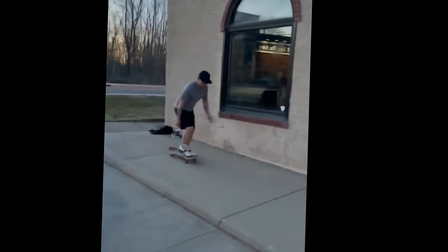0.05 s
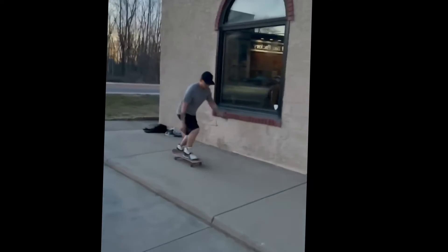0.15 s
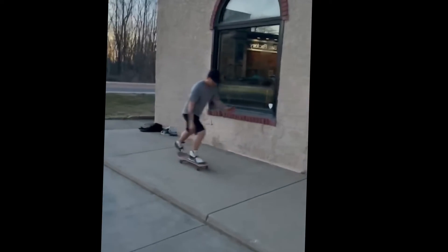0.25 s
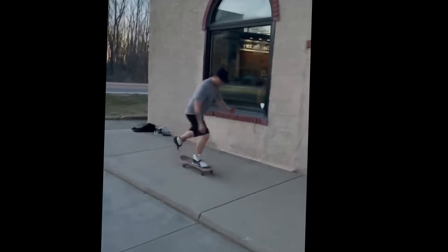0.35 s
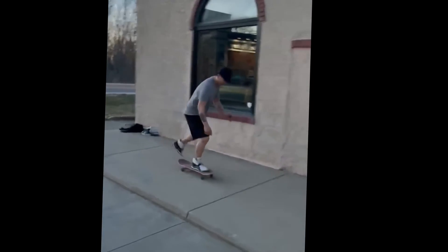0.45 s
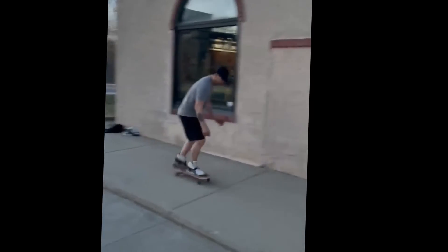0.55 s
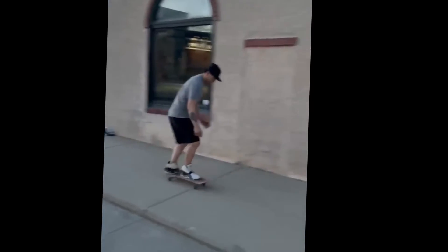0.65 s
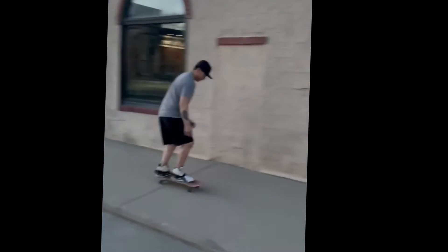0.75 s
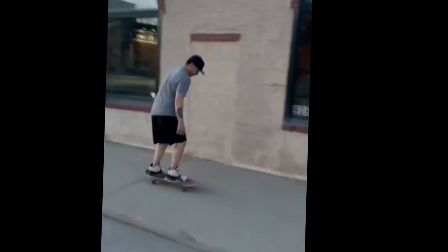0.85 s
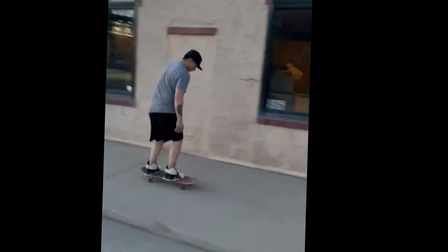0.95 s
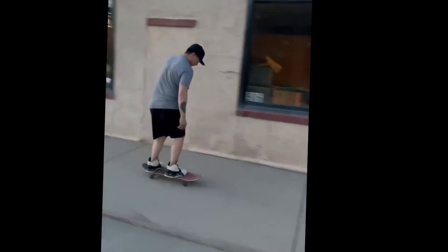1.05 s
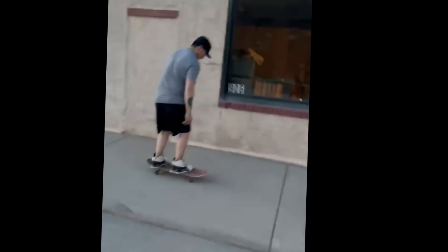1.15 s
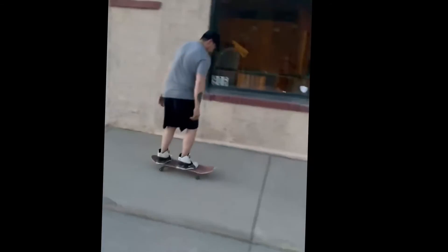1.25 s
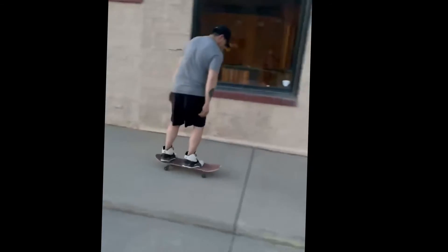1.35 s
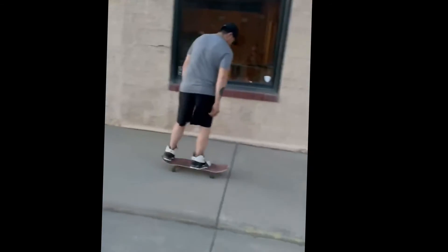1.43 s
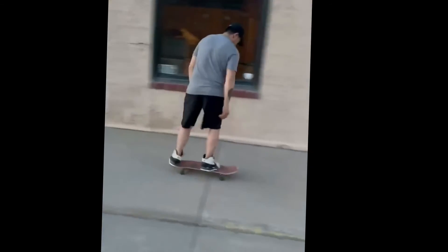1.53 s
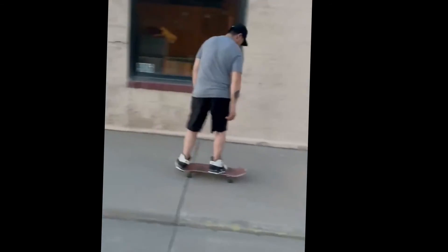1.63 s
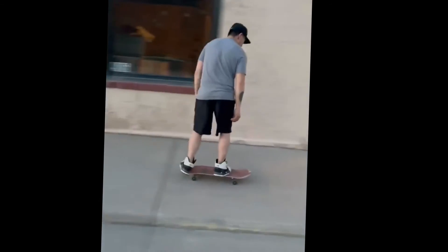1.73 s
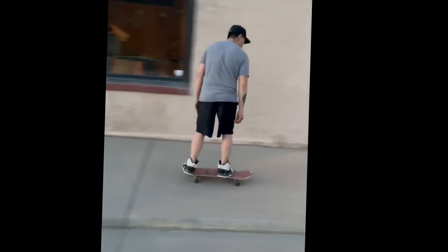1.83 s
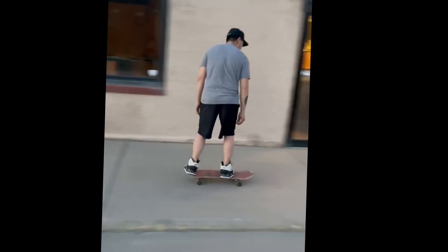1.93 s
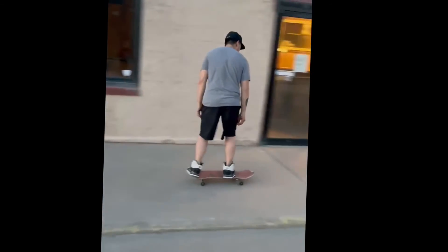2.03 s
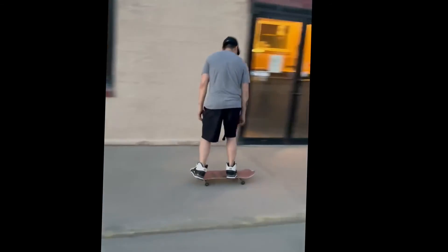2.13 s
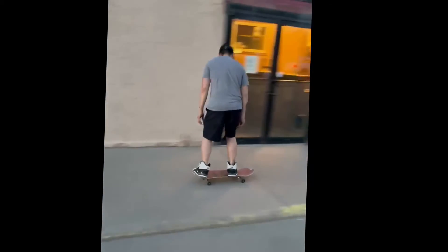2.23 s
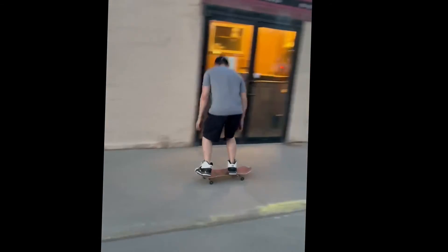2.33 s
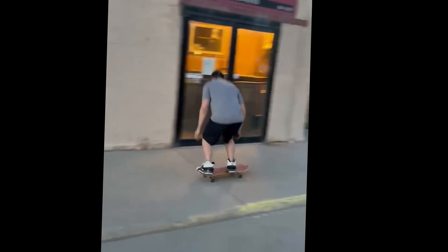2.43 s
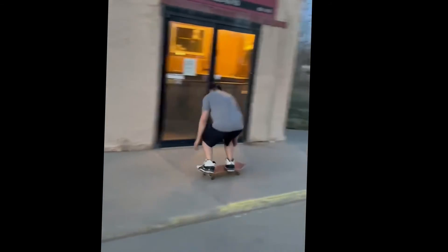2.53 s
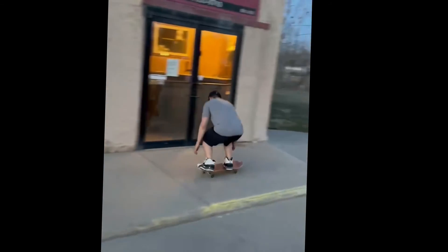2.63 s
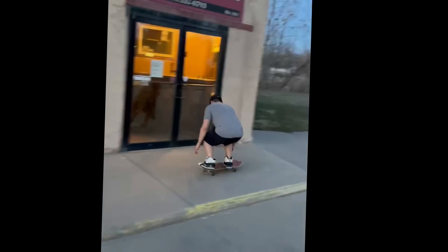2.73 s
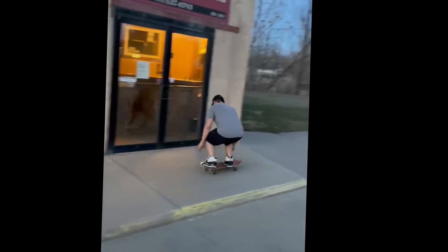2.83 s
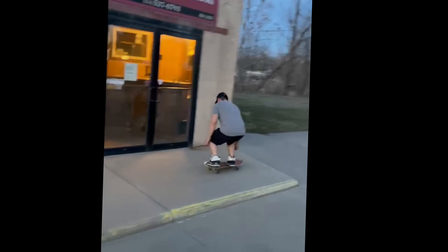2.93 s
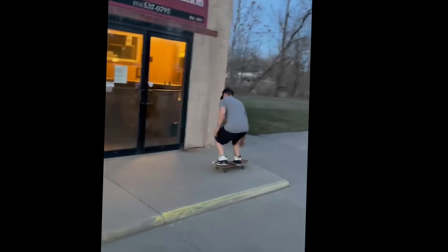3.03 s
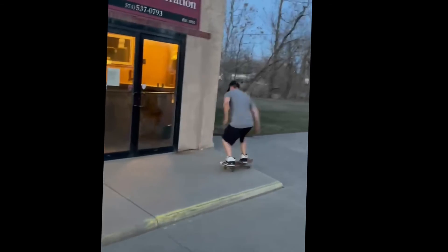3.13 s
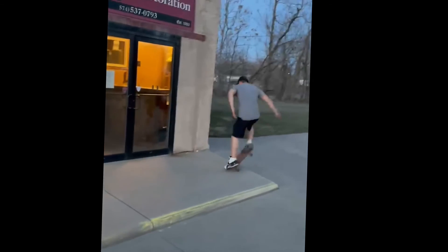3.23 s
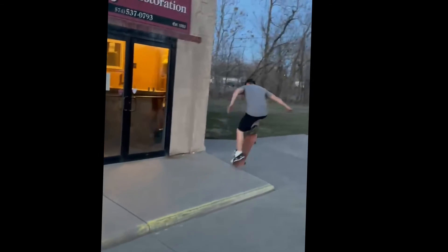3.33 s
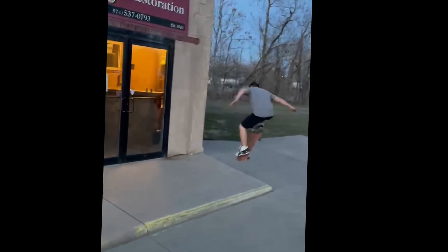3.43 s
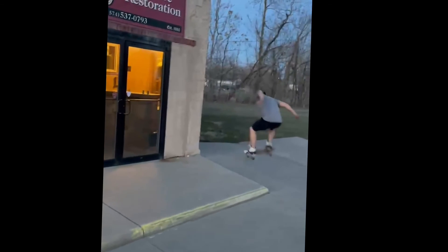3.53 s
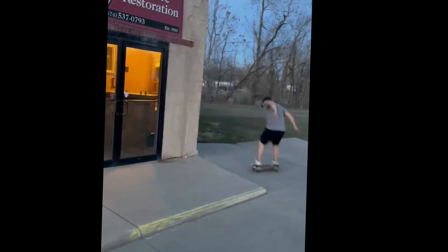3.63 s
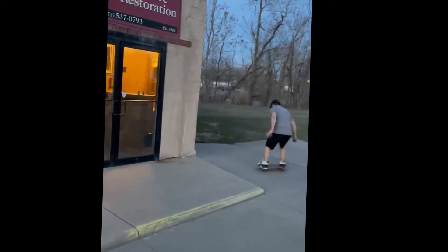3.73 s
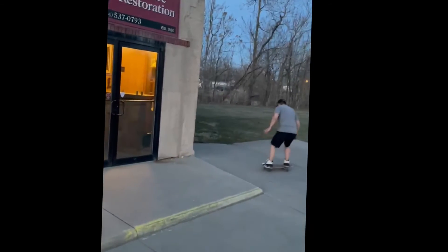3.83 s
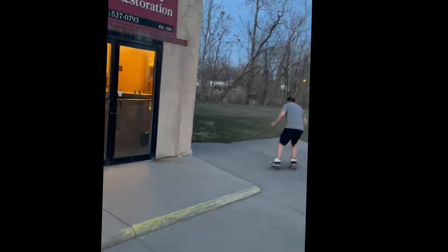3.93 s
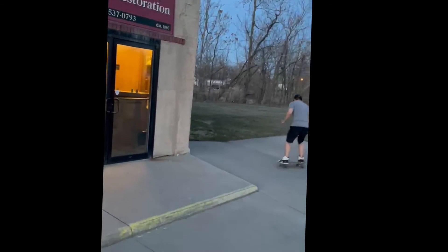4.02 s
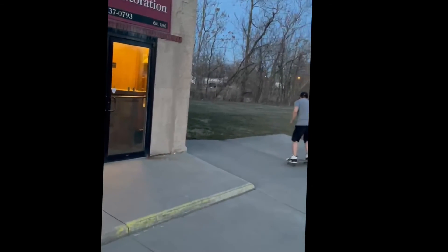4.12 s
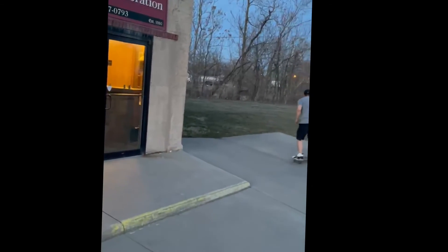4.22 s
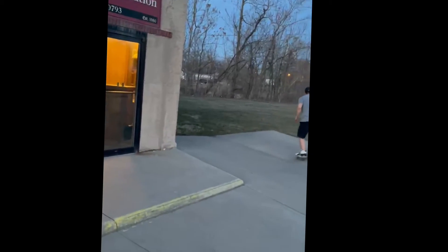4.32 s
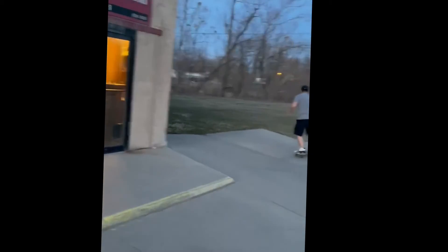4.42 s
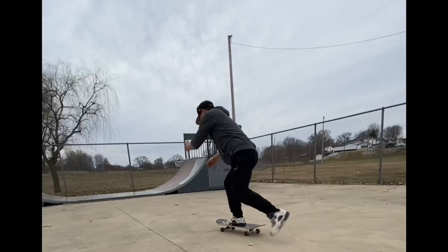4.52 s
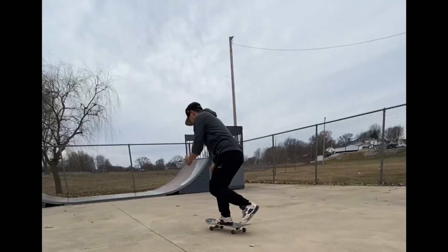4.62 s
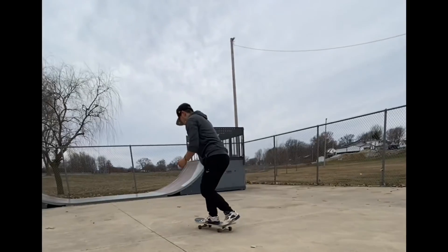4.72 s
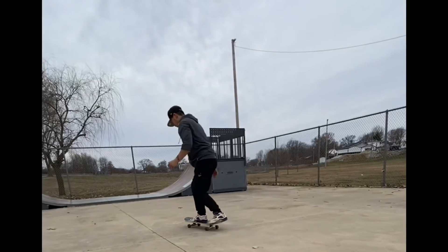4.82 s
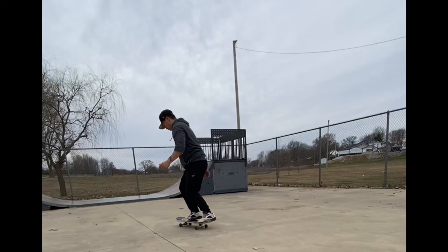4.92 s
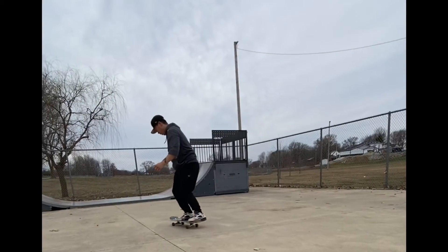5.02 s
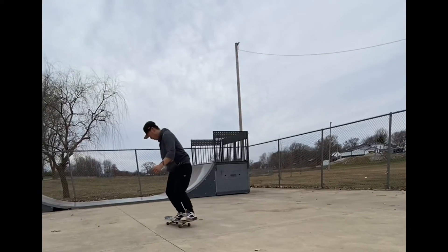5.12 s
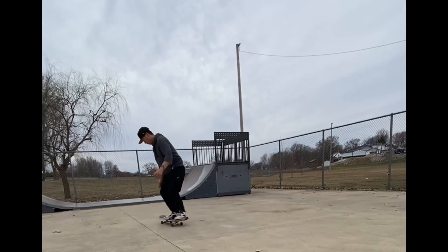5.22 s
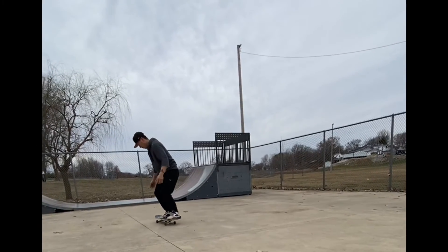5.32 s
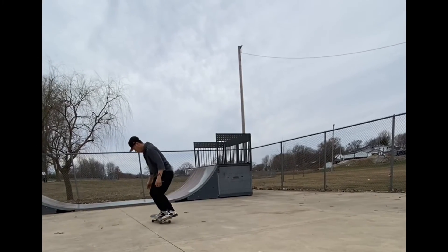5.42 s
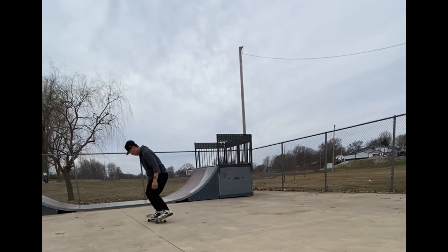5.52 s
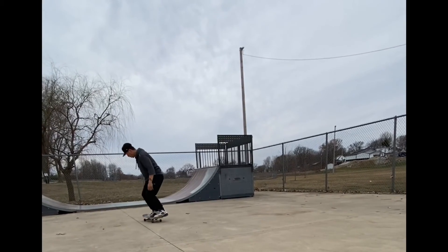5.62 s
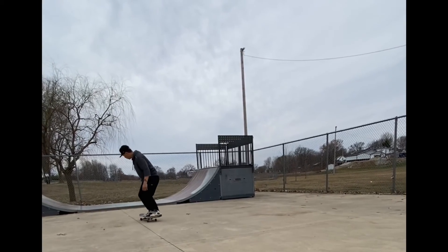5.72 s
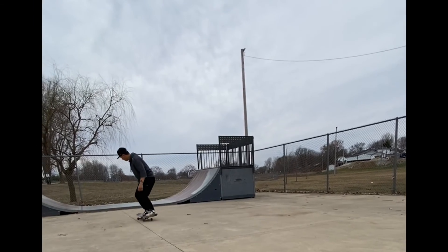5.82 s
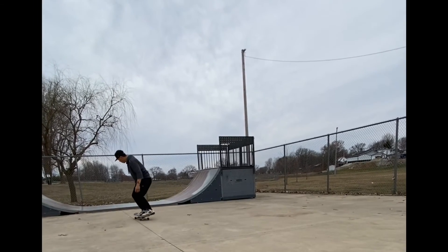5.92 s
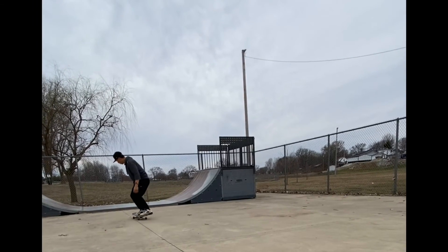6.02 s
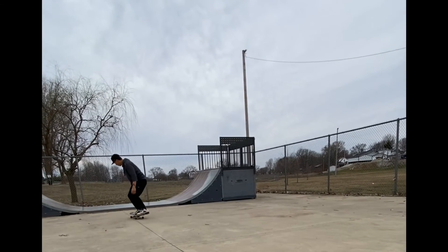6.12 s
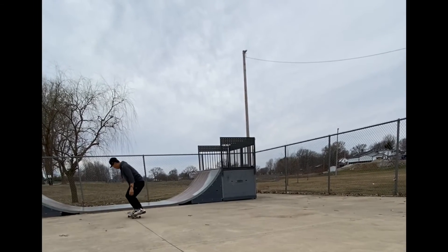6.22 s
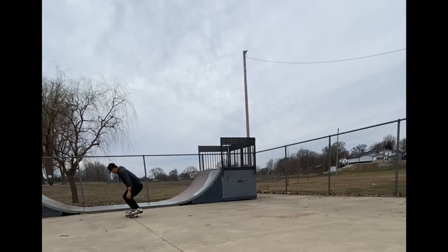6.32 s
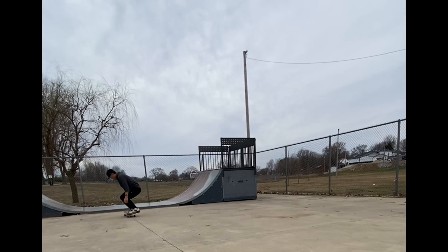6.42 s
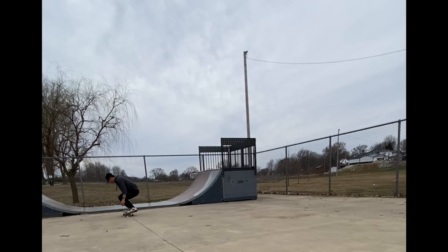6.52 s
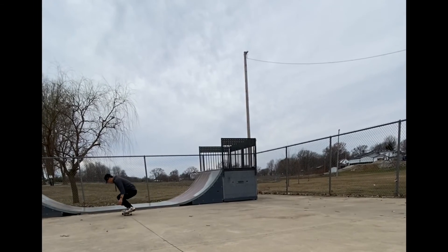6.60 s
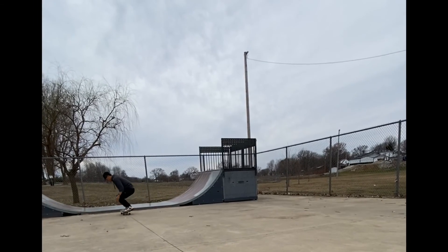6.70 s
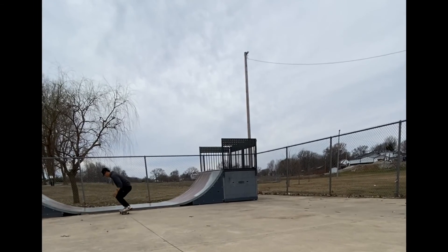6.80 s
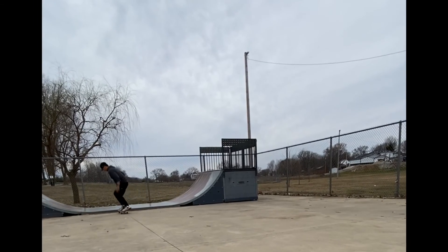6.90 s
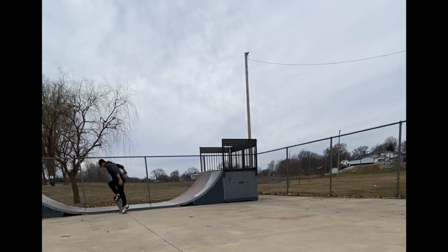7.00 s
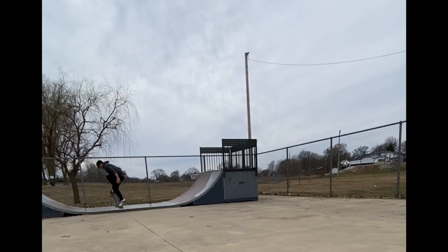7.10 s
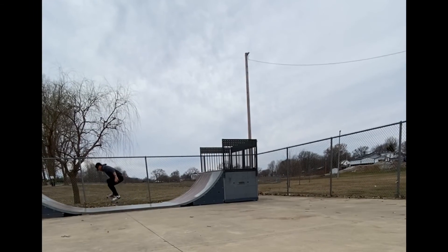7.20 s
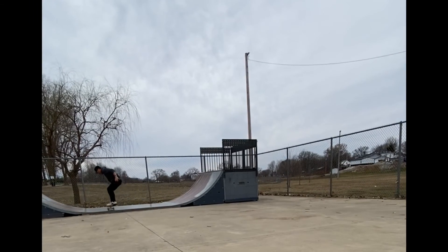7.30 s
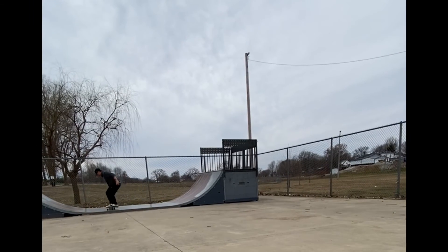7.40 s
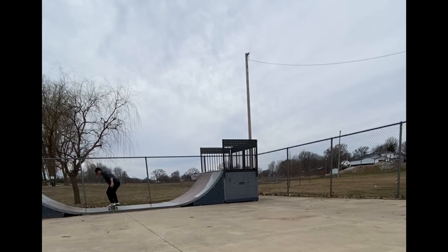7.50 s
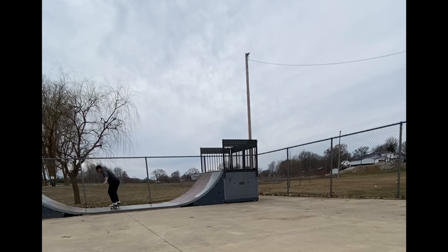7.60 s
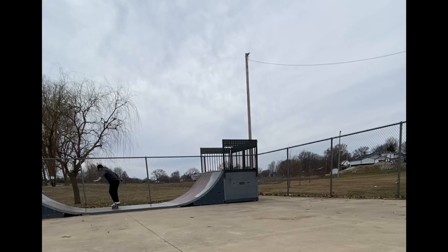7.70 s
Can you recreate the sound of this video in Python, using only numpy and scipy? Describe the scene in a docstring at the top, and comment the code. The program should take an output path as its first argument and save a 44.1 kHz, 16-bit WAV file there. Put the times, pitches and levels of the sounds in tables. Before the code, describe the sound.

From 0 to 4.5 s a skateboard rolls close by on sidewalk concrete, a low rumble with mid roar and gritty hiss, rising slightly around 0.5 s. Wheels cross slab joints in double clacks at about 0.6 and 0.7, 1.45 and 1.6 (deepest), 2.25 and 2.4 s, woody with metallic truck rattle. The hiss dulls as the rider pulls ahead. A sharp tail pop comes at 3.2 s, a doubled landing crack at 3.6, then rolling with ticks, scuffs and a tiny squeak near 4.3. A hard cut at 4.5 s opens onto faint outdoor air and a quieter, smoother roll moving away from a still phone, with light taps and a bright click near 6.25. The roll fades out; a pop at 6.95 leaves a brief gap with faint echo, then a heavy smack at 7.28 booms on a hollow ramp, with small thumps and fading drumming to the end.

```python
"""Skateboards, sidewalk and park

Two skateboard runs on a phone's two microphones, joined by a hard cut. On a sidewalk, riding alongside: filtered
grit noise rumbles, short struck-deck blows clack over joints, then the tail pops and the board lands.
In an open skate park, phone at rest: the roll fades with distance, ticks over seams, pops, and smacks
down at the foot of a hollow ramp that rings in decaying modes under a faint rush of open air.
"""
import sys
import numpy as np
from scipy import signal
from scipy.fft import rfft, irfft, next_fast_len
from scipy.io import wavfile
from scipy.ndimage import uniform_filter1d

SR = 44100
rng = np.random.default_rng(int(sys.argv[2]) if len(sys.argv) > 2 else 0)


def to_wav(sig):
    """Store sig (one row per channel, or 1-D mono) as 16-bit WAV at the path in sys.argv[1].

    Samples outside -1..1 are clipped; the rate is SR.
    """
    pcm = np.clip(np.atleast_2d(sig), -1, 1) * 32767
    pcm = np.round(pcm).astype(np.int16)
    wavfile.write(sys.argv[1], SR, pcm.T)  # frames by channels


N = 341775
TIME = np.arange(N) / SR
CUT_S = 4.48  # sidewalk before, park after

# Spectrum of rolling noise, before its three registers are set to level: f/Hz, density/dB per Hz
WALK_TONE = [(25, -24), (60, -0.5), (100, 1), (200, 0.5), (400, -10), (620, -10.5), (1000, -13.5),
             (1700, -28.5), (3000, -33.5), (8500, -45.5), (11000, -31.5), (13000, -66), (16000, -86.5)]
PARK_TONE = [(25, -35), (70, -0.5), (135, -4), (180, -5.5), (280, 0), (420, -6), (620, -19), (950, -10.5),
             (1600, -12), (2100, -34.5), (2950, -34), (3500, -33), (6000, -35.5), (8000, -40),
             (11500, -37.5), (13500, -38), (16000, -77)]
RAMP_TONE = [(25, -27), (60, -4), (110, 1), (220, -8), (350, -17.5), (700, -26), (1500, -36.5), (3000, -53),
             (6000, -51.5), (9000, -62), (16000, -65)]
# Spectrum of the boards' contact noise, before levelling: f/Hz, density/dB per Hz
WALK_CLACK = [(60, -6), (160, 8.5), (300, -2), (700, -1), (1200, 0), (2000, -13), (3200, -16.5),
              (4500, -24), (5700, -21.5), (8500, -30.5), (10800, -15.5), (13000, -42), (16000, -59)]
PARK_CLACK = [(50, -21), (140, 3), (320, 5.5), (480, -4), (650, -8), (900, 6), (1500, -3), (2400, -9.5),
              (4000, -20), (6000, -24), (8000, -39), (12000, -38), (16000, -47)]
# Ringing of deck and trucks, relative to one another: f/Hz, level/dB, t60/s
WALK_MODES = [(497, -23.5, 0.02), (622, 8, 0.024), (740, -1, 0.087), (960, -15.5, 0.063),
              (1116, -16, 0.025), (1186, -2.5, 0.046), (1696, -18, 0.062), (1730, -1.5, 0.05),
              (2046, 3, 0.012), (2250, -7, 0.051), (2900, -60, .04)]
PARK_MODES = [(576, -7, .06), (770, -8, .07), (875, -2, 0.13), (981, -2, .11), (1152, -4, 0.048),
              (1320, -6, 0.08), (1560, -7, 0.06), (2130, -15, .05), (2320, -5, 0.04), (3250, -19, 0.035),
              (3630, -20, .05)]
# The two microphone ports before shading is scaled: f/Hz, left minus right/dB, left lead/rad
WALK_PORTS = [(100.5, 0, 0), (297, 2, 0.09), (596, 8.5, 0.69), (1103, 12.5, 0.65), (1800, 0, -1.1),
              (2970, 1, 1.5), (4360, 3, 1.32), (5050, 1.5, 4), (5540, 0.5, 5.5), (6330, -5, 6.5),
              (7700, 12, 7.5), (10660, -3.5, 10.5), (14050, 3, 14)]
PARK_PORTS = [(97, 0, 0.5), (352, -0.5, 0), (705, -6, 0.3), (1125, -3.5, 1.5), (1460, 3.5, -0.7),
              (2920, -2.5, 2), (4250, -0.5, 0.46), (5280, -9.5, 6), (5390, -1.5, 6), (7200, -0.5, 7.5),
              (11000, 2, 8.5), (14800, -2, 10)]
# Resonances of the rolling boards, mean gain on the rolling noise: f/Hz, width/Hz, gain/dB
WALK_BODY = [(145, 17, -10), (747, 85, 0), (1240, 140, -7), (1510, 215, -0.5)]
PARK_BODY = [(141, 22, -5), (258, 73, -6), (399, 91, -8.5), (815, 74, -3.5), (2620, 150, 1.5),
             (3430, 200, 3), (5440, 500, -10)]
# They drift as the rider shifts his weight (share of their pitch)
WALK_DRIFT, PARK_DRIFT = 0.053, 0.011
# Passing swells of the rolling sound, from ground, foot, echo or settling trucks:
# peak t/s, half length/s, rumble/dB, roar/dB, hiss/dB
ROLL_SWELLS = [(0.58, 0.088, 8, 1.5, 4), (0.97, 0.16, 0, 0.5, 2.5), (1.416, 0.14, 7.5, 1, 1),
               (1.947, 0.21, 3, 1.5, -1), (3.9, 0.15, 0.5, 1.5, 8.5), (4.668, 0.14, 3, 1, 1),
               (4.87, 0.048, -2.5, 0, 3.5), (5.22, 0.11, 4, 2.5, 3.5), (5.353, 0.045, 0, 3.5, 6.5),
               (6.647, 0.33, 3.5, 2.5, 2.5), (7.468, 0.033, 2, 13, 4.5), (7.69, 0.055, 8, 3, -13)]

# Steady sidewalk roll, near the microphone: rumble/dB, roar/dB, hiss/dB
WALK_ROLL_DB = (-31.5, -35.5, -50.5)
# The rider comes near: rumble, roar and hiss rise by these dB around NEAR_S
APPROACH_DB, NEAR_S = (1, 2.5, 2), 0.5
# Hiss lost in flight, and for each second that the board rides ahead after AHEAD_S
FLIGHT_HISS_DB, AHEAD_S, AHEAD_DB_PER_S = -6, 2.03, -1.06
HISS_LAG_S = .08  # the hiss outlasts the pop
# The sizzle atop the hiss is stronger near the board: edge, gain near and far
SIZZLE_HZ, SIZZLE_NEAR_DB, SIZZLE_FAR_DB = 9100, 1.5, -4
# The level of the roll, its ticks, drones and hum is ducked for a moment around DIP_S
DIP_S, DIP_HALF_S, DIP_DB = 3.70, 0.053, -10.5
# Wheel speed on the sidewalk: t/s, rate/turns per s
WHEEL_TURNS = [(0, 27.3), (1.3, 25.6), (2.7, 31.4), (3.3, 35), (4.47, 38.1)]
# Hum of slightly unround wheels at top speed, before wavering: multiple of turn rate, level/dB
WHEEL_HUM, HUM_DB_PER_OCTAVE = [(2, -38), (3, -39), (4, -40), (8, -43)], 12
# Light scuffs; in the park those near 7.17 s are the pop's faint echo:
# peak t/s, half length/s, centre f/Hz, peak level/dB
WALK_SCUFFS = [(.05, 0.033, 1750, -44), (.49, 0.022, 3470, -46), (1.22, 0.029, 3500, -49),
               (3.10, 0.04, 5920, -52), (3.47, 0.021, 1860, -44.5), (4.01, 0.018, 1500, -36.5),
               (4.41, 0.03, 1300, -41)]
PARK_SCUFFS = [(4.85, .05, 2330, -53), (6.14, 0.0076, 5830, -50.5), (6.305, 0.016, 6000, -55),
               (6.855, .008, 1450, -39), (6.905, 0.03, 3950, -53), (6.924, .013, 2300, -50),
               (7.16, 0.025, 4440, -58), (7.178, 0.0099, 900, -50)]
# Short bright ticks, from grit under the wheels and clicks of wheels and hardware:
# t/s, starting level before final filtering/dB, centre f/Hz
WALK_TICKS = [(.157, -42, 10500), (.314, -42, 8500), (.70, -30, 2500), (.918, -32, 2800), (.953, -21, 1800),
              (1.192, -33, 2500), (3.643, -21, 903), (3.652, -23, 2210), (3.828, -30, 1900),
              (3.866, -29, 1900), (3.946, -32, 2000), (4.003, -27, 1803), (4.018, -26, 1500),
              (4.398, -26, 1600)]
PARK_TICKS = [(4.591, -34, 3000), (4.734, -35, 2500), (5.807, -53, 9000), (5.881, -36, 4000),
              (6.003, -49, 9000), (6.212, -37, 6000), (6.263, -20, 1700), (6.407, -48, 11000),
              (6.601, -33, 6000), (6.630, -35, 7950), (6.781, -40, 9000), (6.853, -28, 2000),
              (7.635, -29, 2300), (7.674, -24, 1500)]
# Each listed tick sounds again, later and weaker
AGAIN_S, AGAIN_DB = 0.008, -7
# The deck drones over some stretches of slab: peak t/s, half length/s, centre f/Hz, peak level/dB
DRONES = [(.34, 0.19, 158, -29.5), (2.72, 0.15, 270, -35.5), (2.9, .33, 92, -34), (4.22, .08, 150, -30.5)]
DRONE_WIDTH_HZ = 45

# In all blow tables, crack levels stand before the trim_db of blows(); wood and clank are relative to knock.
# Front and rear axle over three slab joints: t/s, thud/dB, knock/dB, crack/dB, flex f/Hz, flex t60/s,
# wood mode f/Hz, wood/dB, truck clank f/Hz, clank/dB, rattle/s, second wheel delay/s
JOINTS = [(0.579, -16.5, -24.5, -36.5, 164.6, .12, 740, -2, 1100, -2, 0.0079, 0.008),
          (0.720, -17, -21, -33.5, 157, .055, 760, 2, 1060, -1, .006, .005),
          (1.4404, -13, -17, -35, 135.5, 0.21, 712, 6, 1170, -8, 0.008, 0.0077),
          (1.582, -15.5, -22, -35.5, 180, 0.048, 777, -1, 1140, -2.5, 0.0058, 0.0049),
          (2.2603, -27.5, -20.5, -31.5, 288, 0.055, 760, -1, 1610, 0, 0.02, .013),
          (2.4084, -18.5, -23.5, -36.5, 432, .06, 1276, 0.5, 1790, 3, 0.0089, 0.0056)]
# An askew axle's second wheel hits later, softer, and bends the deck in a higher mode
SECOND_RING_DB, SECOND_WHEEL_DB, SECOND_FLEX_RATIO = -10, -6.5, 1.8
# Tail pop, first wheels down, full weight down: t/s, thud/dB, knock/dB, crack/dB, flex f/Hz,
# flex t60/s, wood mode f/Hz, wood/dB, truck clank f/Hz, clank/dB, rattle/s
WALK_JUMP = [(3.2125, -27.5, -20, -26.5, 321, 0.13, 1105, 1, 2250, -4.5, .015),
             (3.575, -22.5, -18.5, -22.5, 273, .069, 915, 0.5, 2300, -10, 0.011),
             (3.584, -19, -16.5, -30.5, 450, 0.017, 596, -0.5, 805, -2, 0.01)]
PARK_JUMP = [(6.951, -31, -25.5, -33, 325, 0.078, 900, -4, 2350, -2.5, 0.0075),
             (7.276, -18, -16, -27.5, 180, 0.15, 873, -1.5, 986, -4, 0.0035),
             (7.283, -11, -23, -27, 92, 0.12, 1145, -7, 1590, -7, 0.013)]
# Light knocks; in the park the one near 7.17 s is the pop's faint echo:
# t/s, thud/dB, knock/dB, deck flex f/Hz
WALK_TAPS = [(2.240, -36, -31, 200), (2.420, -28.5, -38, 136), (3.291, -49, -42, 250),
             (3.399, -46.5, -40, 252), (3.642, -49.5, -38, 200), (3.652, -58, -43.5, 200)]
PARK_TAPS = [(4.591, -29, -46, 281), (4.607, -33, -44, 237), (4.734, -27, -45, 278), (4.743, -35, -52, 410),
             (5.222, -37, -54, 330), (5.802, -40, -55, 202), (5.880, -39.5, -45.5, 268),
             (6.032, -29.5, -49, 276), (6.104, -45, -56, 315), (6.147, -36, -50, 347),
             (6.491, -40.5, -59, 237), (6.212, -42, -47.5, 262), (6.258, -38.5, -46.5, 256),
             (6.605, -35.5, -46.5, 247), (6.631, -36, -53, 154), (6.853, -35.5, -33.5, 270),
             (7.173, -57, -60, 252), (7.634, -42, -46.5, 118), (7.673, -36, -45, 177)]
# Shared by each board's knocks: crack over knock/dB, flex t60/s, wood mode f/Hz, wood/dB,
# truck clank f/Hz, clank/dB, rattle/s
WALK_TAP_VOICE = (-16, 0.1, 747, 4, 1499, -6.5, 0.07)
PARK_TAP_VOICE = (-10, 0.055, 1002, -8.5, 1450, 2, 0.0366)
# A short high chirp that sags in pitch
CHIRP_S, CHIRP_HOLD_S, CHIRP_FADE_S, CHIRP_DB = 4.286, .03, .05, -49
CHIRP_HZ, CHIRP_DROP_HZ = 3640, 450

# Open air over the park, before levelling: f/Hz, density/dB per Hz
AIR_TONE = [(30, -3), (70, 2), (250, -2), (600, -13.5), (950, -7), (1600, -15), (2600, -25.5),
            (5500, -34.5), (14000, -56)]
AIR_DB = -56  # of the part shared by both channels, before it swells
# The park board rolls away from the phone: distance at the cut, speed
START_M, SPEED_M_S = 2.95, 3.62
# Rumble, roar and hiss: level at that distance/dB, change per doubling of distance/dB
PARK_ROLL_DB, RECEDE_DB = (-42.5, -41, -54), (-3, -5, -6.5)
# It rolls more lightly until the pushing foot is back on the deck
LOADED_S, UNLOADED_DB = 4.59, -5.5
# Rumble, roar and hiss on the ramp: level on landing before the boom/dB, fade/dB per s
RAMP_ROLL_DB, RAMP_FADE_DB_PER_S = (-32, -44.5, -53.5), (-22.5, -56, -35)
RAMP_BOOM_DB, RAMP_BOOM_S = 17, 0.049  # the hollow ramp booms at first
# Ringing of the hollow ramp, relative to one another: f/Hz, mean level/dB, t60/s
RAMP_MODES = [(89.5, -3, 0.16), (121, 2, .17), (179, -4, .15), (256.6, -8.5, .2), (296, -8, 0.066),
              (345, -10, .13), (442, -20.5, 0.21), (574, -9.5, 0.059)]
# The rider's weight settles and the wheels bump up the ramp: t/s, level over the first 30 ms/dB
RAMP_THUMPS = [(7.295, -17), (7.362, -24), (7.420, -30), (7.452, -30), (7.498, -33), (7.536, -34.5),
               (7.703, -32)]


def undb(db):
    """Amplitude factor of a level in dB."""
    return 10 ** (np.asarray(db) / 20)


def unit(x):
    """Scaled to rms 1."""
    return x / np.sqrt(np.mean(x ** 2))


def unit_onset(x):
    """Scaled to rms 1 over the first 30 ms."""
    return x / np.sqrt(np.mean(x[:int(.03 * SR)] ** 2))


def on_log_hz(hz, points):
    """Each column of a (Hz, ..) table, read at the given frequencies."""
    f, *columns = np.transpose(points)
    return [np.interp(np.log(np.maximum(hz, 1)), np.log(f), c) for c in columns]


def colour(x, points, size=4096):
    """Causal minimum-phase filter with the given (Hz, dB) spectrum."""
    db, = on_log_hz(np.arange(size // 2 + 1) * SR / size, points)
    cepstrum = irfft(np.log(undb(db)))
    # folding the cepstrum forward makes the response causal
    cepstrum[1:size // 2] *= 2
    cepstrum[size // 2 + 1:] = 0
    response = irfft(np.exp(rfft(cepstrum)))
    return signal.fftconvolve(x, response)[:len(x)]


def registers(x):
    """Bass, middle and treble of a sound."""
    edges = [(400, "low"), ((400, 2500), "band"), (2500, "high")]
    return [signal.sosfilt(signal.butter(4, hz, kind, fs=SR, output="sos"), x) for hz, kind in edges]


def resonance(x, hz, width):
    """Band-pass with gain 1 at its centre."""
    return signal.lfilter(*signal.iirpeak(hz, hz / width, fs=SR), x)


def drifting(x, hz, width, drift):
    """Band-pass with gain 1 at a centre that wanders slowly."""
    turn = np.exp(2j * np.pi * np.cumsum(hz * (1 + drift * walk(7.04))) / SR)
    pole = np.exp(-np.pi * width / SR)
    # shift the centre to 0 Hz, low-pass there, shift back
    return 2 * np.real(turn * signal.lfilter([1 - pole], [1, -pole], x / turn))


def walk(rate):
    """Random levels held 1 / rate s and slewed twice; spread near 1."""
    k = int(SR / rate)
    held = np.repeat(rng.standard_normal(N // k + 1), k)
    return 1.132 * uniform_filter1d(uniform_filter1d(held, k), k)[:N]


def between(start, end, fade=0.004):
    """Gate that is open from start to end."""
    opening = np.clip((TIME - start) / fade + .5, 0, 1)
    closing = np.clip((end - TIME) / fade + .5, 0, 1)
    return opening * closing


def swell(s, half_s):
    """Bell-shaped rise and fall around a moment."""
    return np.exp(-((TIME - s) / half_s) ** 2)


def ports(x, table, shade):
    """Two ports a hand apart: the phone's body delays and shades the sound, more shade for sources off-side."""
    size = next_fast_len(N + 4096)
    db, lead = on_log_hz(np.arange(size // 2 + 1) * SR / size, table)
    spectrum, gain = rfft(x, size), undb(shade * db / 2)
    left = irfft(spectrum * gain, size)
    right = irfft(spectrum / gain * np.exp(-1j * lead), size)
    return np.array([left, right])[:, :N]


def surroundings(x, t60, bass_db, treble_db, echo_s, echo_db):
    """Scatter from ground and walls, then a smeared far echo; only the bass is alike in both channels."""
    t = np.arange(SR) / SR
    late = np.maximum(t - echo_s, 0)
    scatter = (1 - np.exp(-t / 0.0012)) * undb(-60 * t / t60)
    echo = undb(echo_db) * (1 - np.exp(-late / 0.0025)) * np.exp(-late / 0.029)
    shape = scatter + echo
    bass = registers(rng.standard_normal(SR))[0]
    out = []
    for _ in range(2):
        _, middle, treble = registers(rng.standard_normal(SR))
        mix = undb(bass_db) * bass + middle + undb(treble_db) * treble
        response = mix * shape / np.sqrt(np.sum(shape ** 2))
        out.append(signal.fftconvolve(x, response)[:N])
    return np.array(out)


def grit(count, spread_db):
    """Dense tiny collisions, a few much harder than the rest."""
    hardness_db = spread_db * np.minimum(rng.exponential(size=count), 7)
    return unit(rng.standard_normal(count) * undb(hardness_db))


def alongside():
    """Sidewalk rumble, roar and hiss (dB): steady once near; the hiss thins riding ahead and in flight."""
    far = 1 - between(NEAR_S, np.inf, fade=0.37)
    levels = np.array(WALK_ROLL_DB)[:, None] - np.outer(APPROACH_DB, far)
    flight = between(WALK_JUMP[0][0] + HISS_LAG_S, WALK_JUMP[1][0], fade=0.11)
    levels[2] += AHEAD_DB_PER_S * np.maximum(TIME - AHEAD_S, 0) + FLIGHT_HISS_DB * flight
    return levels


def wheels(levels, tone, body, drift, grit_db, turn_hz, turn_db, flicker_db):
    """Wheels on grit shake the deck; the load throbs once a turn and flickers, and the roll swells in passing."""
    throb = turn_db * np.sin(2 * np.pi * np.cumsum(turn_hz * (1 + 0.038 * walk(2.6))) / SR)
    surface = walk(30)
    swells = sum(np.outer(db, swell(s, half_s)) for s, half_s, *db in ROLL_SWELLS)
    shaking = colour(grit(N, grit_db), tone)
    deck = sum(undb(db + 3.6 * walk(9)) * drifting(shaking, hz, width, drift) for hz, width, db in body)
    out = 0
    for band, level, flicker in zip(registers(shaking + deck), levels + swells, flicker_db):
        load = undb(throb + flicker * (surface + walk(16)) / 2)
        out = out + unit(band * load) * undb(level)
    return out


def dulled(x):
    """The top of the hiss fades as the rider pulls ahead."""
    top = signal.sosfiltfilt(signal.butter(4, SIZZLE_HZ, "high", fs=SR, output="sos"), x)
    db = np.interp(TIME, [AHEAD_S, WALK_JUMP[0][0]], [SIZZLE_NEAR_DB, SIZZLE_FAR_DB])
    return x + top * (undb(db) - 1)


def hum(turn_hz, wander, waver_db):
    """Unround wheels drone on multiples of their turn rate, higher and louder with speed."""
    phase = 2 * np.pi * np.cumsum(turn_hz * (1 + wander * walk(8))) / SR
    lines = sum(np.sin(round(k) * phase) * undb(db + waver_db * walk(12)) for k, db in WHEEL_HUM)
    return np.sqrt(2) * lines * undb(HUM_DB_PER_OCTAVE * np.log2(turn_hz / turn_hz.max()))


def bright_ticks(listed, start, end, count, level_db, spread_db, tick_s, centre_hz):
    """Ticks of grit, wheels and hardware as decaying noise: a few listed, and faint ones at random moments."""
    out = np.zeros(N)
    t = np.arange(SR // 50) / SR
    again = [(s + AGAIN_S, db + AGAIN_DB, hz) for s, db, hz in listed]
    faint = [(start + when * (end - start), level_db - spread_db * strength, centre_hz)
             for when, strength in rng.random((count, 2))]
    for s, db, hz in [*listed, *again, *faint]:
        i = int(s * SR)
        noise = unit(resonance(rng.standard_normal(len(t)), hz, hz / 2))
        out[i:i + len(t)] += resonance(noise * np.exp(-t / tick_s), hz, hz) * undb(db)
    return out


def scuffs(table, spread_db):
    """Light scuffs: each a swell of coarse noise grains in a broad band."""
    out = 0
    for s, half_s, hz, db in table:
        grains = resonance(resonance(grit(N, spread_db), hz, hz), hz, hz / 2)
        out = out + unit(grains) * undb(db) * swell(s, half_s)
    return out


def drones():
    """The slab's texture drives one low resonance of the deck for a while."""
    out = 0
    for s, half_s, hz, db in DRONES:
        shaken = resonance(resonance(rng.standard_normal(N), hz, DRONE_WIDTH_HZ), hz, DRONE_WIDTH_HZ)
        out = out + unit(shaken) * undb(db) * swell(s, half_s)
    return out


def joints():
    """Two blows for each axle: it crosses askew, so its second wheel hits later."""
    for s, thud_db, knock_db, crack_db, hz, t60, wood_hz, wood_db, *rest, skew_s in JOINTS:
        levels = np.array([thud_db, knock_db, crack_db])
        yield (s, *levels, hz, t60, wood_hz, wood_db, *rest)
        yield (s + skew_s, *(levels + SECOND_WHEEL_DB), hz * SECOND_FLEX_RATIO, t60 / 2,
               wood_hz, wood_db + SECOND_RING_DB, *rest)


def blows(table, tone, modes, ring_db, wood_t60, boom_db, tail_db, tail_s, chatter_db, trim_db):
    """Each blow bends the deck, rings its modes, and sets wheels and trucks chattering on the concrete."""
    count = SR // 2
    t = np.arange(count) / SR
    out = np.zeros(N + count)
    # soft urethane wheels take a moment to load
    squeeze = 1 - np.exp(-t / .0015)
    settling = undb(tail_db) * np.exp(-t / tail_s)
    for (s, thud_db, knock_db, crack_db, flex_hz, flex_t60,
         wood_hz, wood_db, clank_hz, clank_db, rattle_s) in table:
        contact = np.exp(-(t / rattle_s) ** 2)
        # the hardware hits in bursts about a millisecond long
        bursts = undb(chatter_db * unit(uniform_filter1d(rng.standard_normal(count), size=48)))
        chatter = rng.standard_normal(count) * squeeze * bursts
        boom, knock, crack = registers(colour(chatter * (contact + settling), tone))
        clank = resonance(resonance(chatter * contact, clank_hz, clank_hz / 2), clank_hz, clank_hz / 5)
        # where the blow lands decides how strongly, and with which sign, each mode answers
        chance = rng.standard_normal((len(modes), 3))
        ring = 0
        for (hz, db, t60), (side, vary, detune) in zip(modes, chance):
            decay = np.sign(side) * undb(db + 2 * vary - 60 * t / t60)
            ring = ring + decay * np.sin(2 * np.pi * hz * (1 + 0.0086 * detune) * t)
        ring = squeeze * ring
        wood = squeeze * np.sin(2 * np.pi * wood_hz * t) * undb(-60 * t / wood_t60)
        # the rider's weight makes the bending a slow, soft push
        push = 1 - np.exp(-(t / 0.0055) ** 2)
        flex = np.sin(2 * np.pi * flex_hz * t) * undb(-60 * t / flex_t60) * push
        thud = unit_onset(flex) + undb(boom_db) * unit_onset(boom)
        knock = unit_onset(knock) + undb(ring_db) * unit_onset(ring)
        knock = knock + undb(wood_db) * unit_onset(wood) + undb(clank_db) * unit_onset(clank)
        i = int(s * SR)
        for part, db, trim in zip((thud, knock, crack), (thud_db, knock_db, crack_db), trim_db):
            out[i:i + count] += unit_onset(part) * undb(db + trim)
    return out[:N]


def taps(table, voice):
    """Light blows that differ only in moment, strength and how the deck bends."""
    crack_db, *ringing = voice
    return [(s, thud_db, knock_db, knock_db + crack_db, flex_hz, *ringing)
            for s, thud_db, knock_db, flex_hz in table]


def chirp():
    """A raspy little squeak, a jittered sine, that drops onto its pitch, holds and fades."""
    since = np.maximum(TIME - CHIRP_S, 0)
    hz = CHIRP_HZ + CHIRP_DROP_HZ * np.exp(-since / 0.0061)
    pitch = hz * (1 + .065 * walk(1500))
    fade = np.exp(-np.maximum(since - CHIRP_HOLD_S, 0) / CHIRP_FADE_S)
    shape = between(CHIRP_S, np.inf, fade=.012) * fade
    return np.sqrt(2) * np.sin(2 * np.pi * np.cumsum(pitch) / SR) * undb(CHIRP_DB) * shape


def sidewalk():
    """Close boards on slabs beside a house wall; one of them rolls on through the jump."""
    turn_hz = np.interp(TIME, *np.transpose(WHEEL_TURNS))
    roll = wheels(alongside(), WALK_TONE, WALK_BODY, WALK_DRIFT, grit_db=2,
                  turn_hz=turn_hz, turn_db=0.9, flicker_db=(2.3, 1.7, 1.6))
    ticks = bright_ticks(WALK_TICKS, 0, CUT_S, count=110, level_db=-35, spread_db=12.0,
                         tick_s=0.0013, centre_hz=1900)
    roll = dulled(roll) + ticks + drones() + hum(turn_hz, wander=0.0201, waver_db=3.5)
    roll = roll * undb(DIP_DB * swell(DIP_S, DIP_HALF_S))
    strikes = [*joints(), *WALK_JUMP, *taps(WALK_TAPS, WALK_TAP_VOICE)]
    hits = blows(strikes, WALK_CLACK, WALK_MODES, ring_db=-2, wood_t60=0.076, boom_db=-4.5,
                 tail_db=-22, tail_s=0.028, chatter_db=3.7, trim_db=(0, 0, 2))
    scatter = surroundings(roll + undb(-5) * hits, t60=.14, bass_db=-11, treble_db=-2,
                           echo_s=.07, echo_db=-25)
    scuffing = scuffs(WALK_SCUFFS, spread_db=2.0)
    direct = ports(roll + chirp(), WALK_PORTS, shade=0.18)
    direct = direct + ports(dulled(hits) + scuffing, WALK_PORTS, shade=0.61)
    return direct + undb(-7) * scatter


def open_air():
    """A faint, far, slowly swelling rush of filtered noise, partly alike in both channels."""
    shared, left, right = (unit(colour(rng.standard_normal(N), AIR_TONE)) for _ in range(3))
    return (shared + 1.1 * np.array([left, right])) * undb(AIR_DB + walk(2.23))


def receding():
    """Park rumble, roar and hiss (dB): they grow with the rider's weight and fall with distance."""
    metres = START_M + SPEED_M_S * np.maximum(TIME - CUT_S, 0)
    weight_db = UNLOADED_DB * between(0, LOADED_S, fade=0.067)
    return np.array(PARK_ROLL_DB)[:, None] + np.outer(RECEDE_DB, np.log2(metres / START_M)) + weight_db


def climbing():
    """Rumble, roar and hiss (dB) on the ramp: a boom on landing, then a fade as the board slows."""
    since = np.maximum(TIME - PARK_JUMP[-1][0], 0)
    levels = np.array(RAMP_ROLL_DB)[:, None] + np.outer(RAMP_FADE_DB_PER_S, since)
    levels[0] += RAMP_BOOM_DB * np.exp(-since / RAMP_BOOM_S)
    return levels


def ramp_thumps(push_s, vary_db):
    """Soft pushes ring the hollow ramp, each at another spot and so with another mix of its modes."""
    count = SR // 2
    t = np.arange(count) / SR
    out = np.zeros(N + count)
    for s, level_db in RAMP_THUMPS:
        chance = rng.standard_normal((len(RAMP_MODES), 2))
        ring = 0
        for (hz, db, t60), (side, vary) in zip(RAMP_MODES, chance):
            decay = np.sign(side) * undb(db + vary_db * vary - 60 * t / t60)
            ring = ring + decay * np.sin(2 * np.pi * hz * t)
        ring = ring * (1 - np.exp(-t / push_s))
        i = int(s * SR)
        out[i:i + count] += unit_onset(ring) * undb(level_db)
    return out[:N]


def park():
    """A board on a smooth slab, its roll silent in flight, then drumming on the ramp; fence and ramps answer."""
    pop_s, landed_s = PARK_JUMP[0][0], PARK_JUMP[-1][0]
    roll = wheels(receding(), PARK_TONE, PARK_BODY, PARK_DRIFT, grit_db=2.5,
                  turn_hz=20.98, turn_db=1.0, flicker_db=(2.5, 1.1, 1.8))
    roll = roll * between(0, pop_s - .04, fade=0.15)
    ramp = wheels(climbing(), RAMP_TONE, PARK_BODY, PARK_DRIFT, grit_db=2.5,
                  turn_hz=11.0, turn_db=0.0, flicker_db=(2.2, 1.5, 1.5))
    ramp = ramp * between(landed_s, np.inf)
    strikes = [*PARK_JUMP, *taps(PARK_TAPS, PARK_TAP_VOICE)]
    hits = blows(strikes, PARK_CLACK, PARK_MODES, ring_db=-5, wood_t60=0.076, boom_db=-3,
                 tail_db=-10.5, tail_s=0.022, chatter_db=4.0, trim_db=(0, 0, 1))
    scatter = surroundings(roll + undb(-8) * hits, t60=.33, bass_db=-8, treble_db=-5,
                           echo_s=.205, echo_db=-12)
    ticks = bright_ticks(PARK_TICKS, CUT_S, pop_s, count=36, level_db=-46, spread_db=13,
                         tick_s=0.0011, centre_hz=3800)
    scuffing = scuffs(PARK_SCUFFS, spread_db=4.5)
    thumps = ramp_thumps(push_s=0.0029, vary_db=3.0)
    direct = ports(roll + scuffing + ticks, PARK_PORTS, shade=1.07)
    direct = direct + ports(hits + ramp + thumps, PARK_PORTS, shade=1.24)
    return direct + undb(-10) * scatter


def scene():
    """The sidewalk up to the cut, then the park with its open air."""
    first = between(-1, CUT_S)
    return first * sidewalk() + (1 - first) * (park() + open_air())


def record(dry):
    """The phone drops the deepest bass, rounds the loudest peaks and cuts the top."""
    thin = signal.sosfilt(signal.butter(2, 38, "high", fs=SR, output="sos"), dry)
    rounded = thin / (1 + (thin / .95) ** 4) ** .25
    return signal.sosfilt(signal.ellip(8, .2, 70, 15900, fs=SR, output="sos"), rounded)


dry = scene()
out = record(dry)
to_wav(out)
```